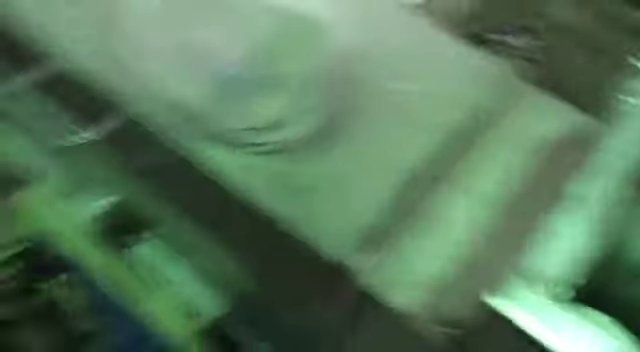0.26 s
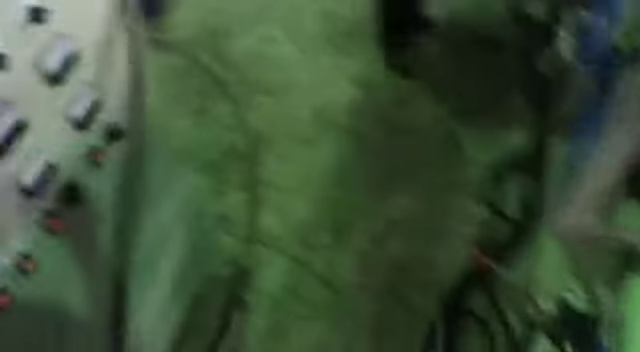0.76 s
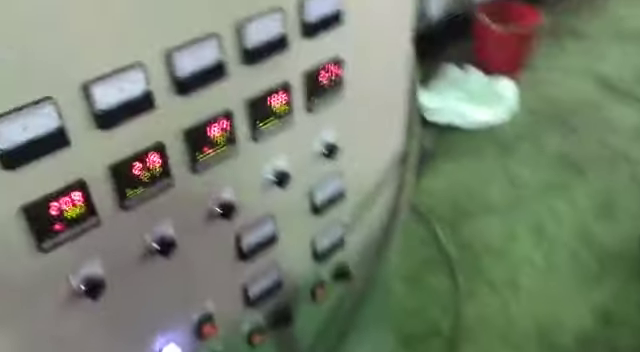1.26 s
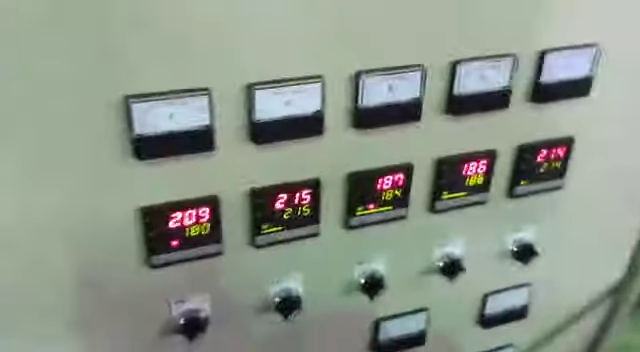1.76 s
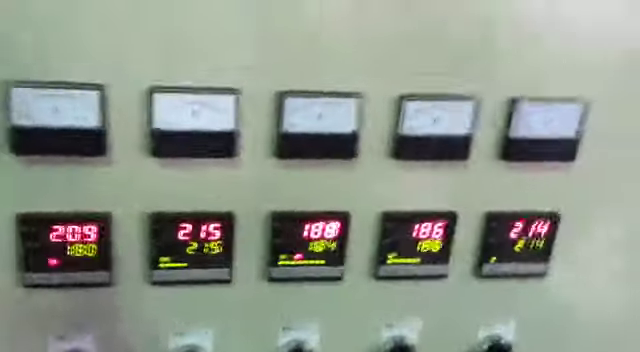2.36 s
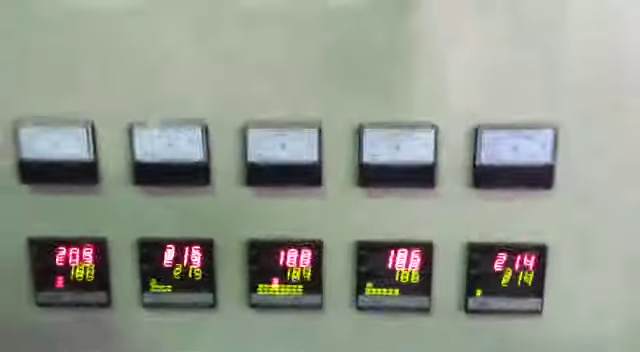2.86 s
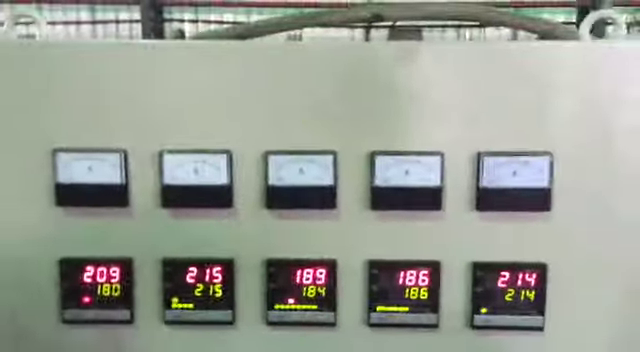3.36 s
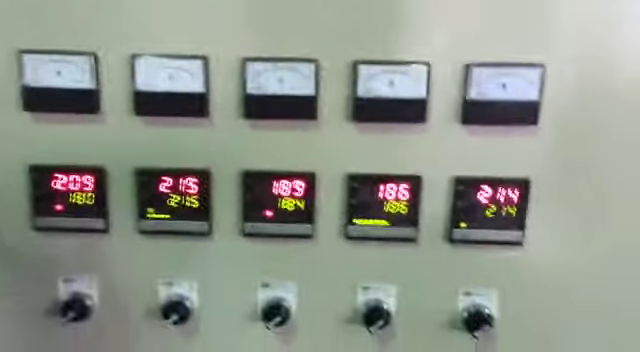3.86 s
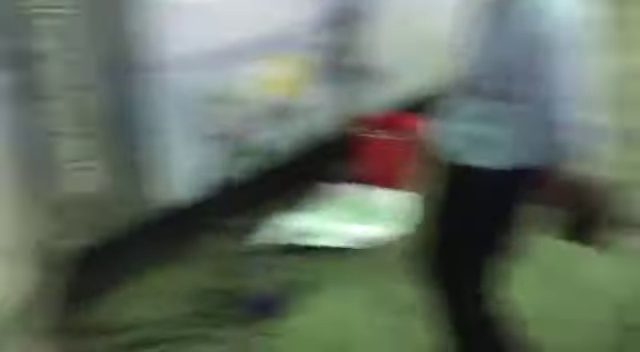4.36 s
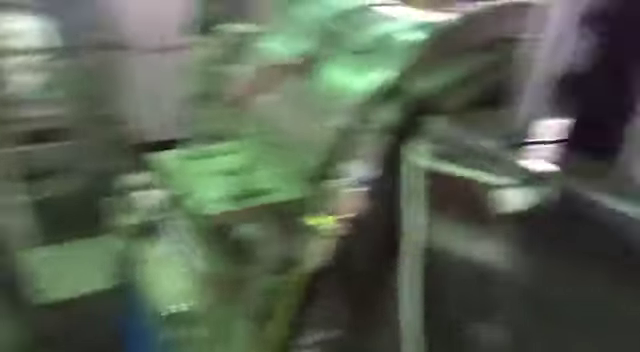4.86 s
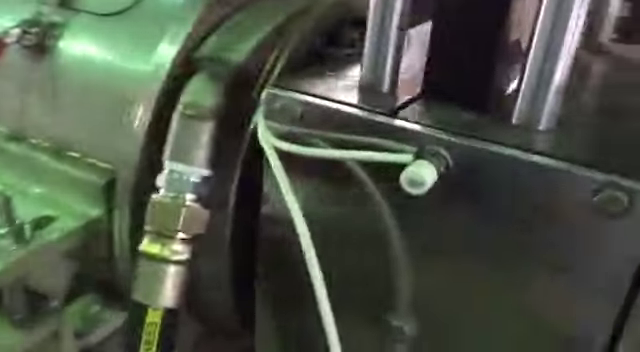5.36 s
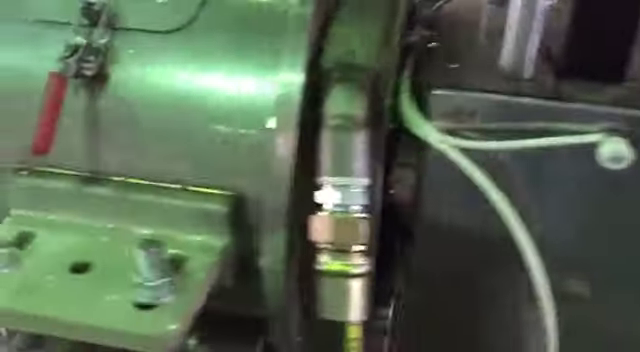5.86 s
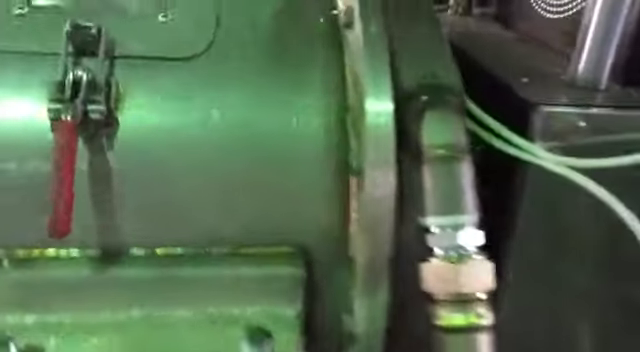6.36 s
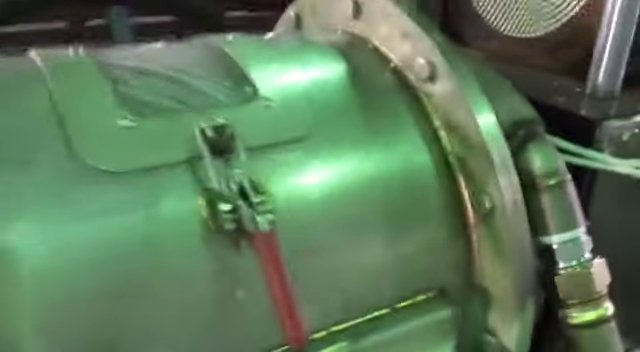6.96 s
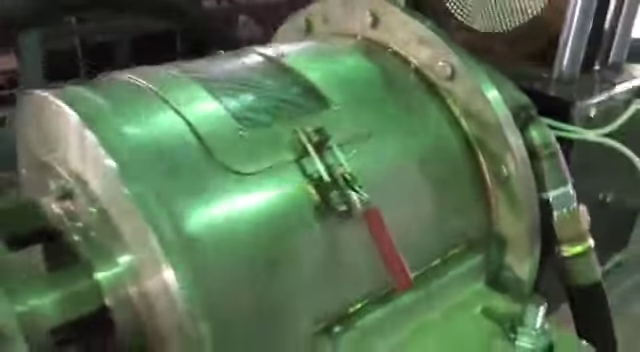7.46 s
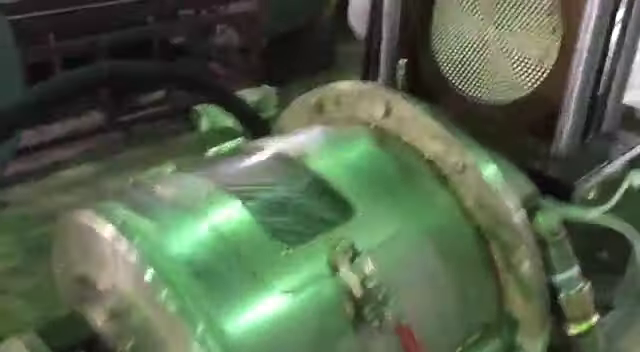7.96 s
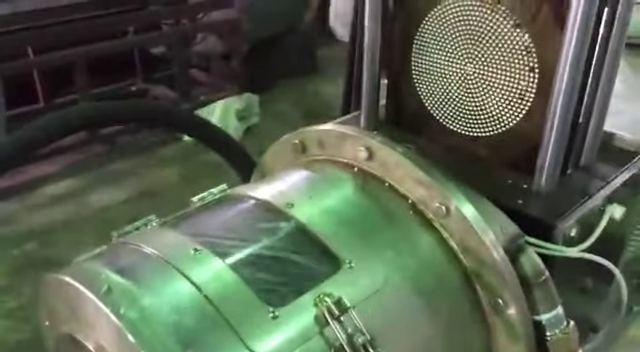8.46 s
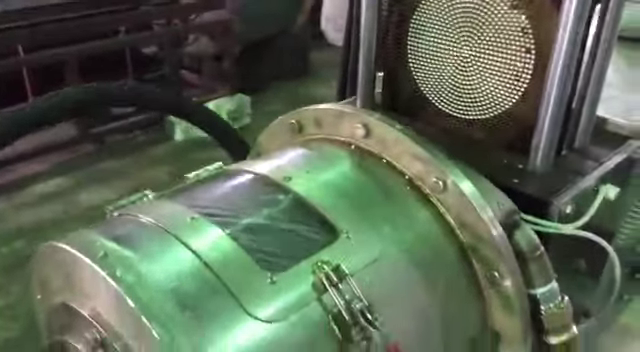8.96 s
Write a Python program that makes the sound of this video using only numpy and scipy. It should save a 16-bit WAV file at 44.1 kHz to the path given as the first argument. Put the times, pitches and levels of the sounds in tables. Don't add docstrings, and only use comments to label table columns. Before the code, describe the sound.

Continuous loud factory drone with a throbbing low hum, wandering gear and motor whines, a few early belt squeals and a rough airy roar.

```python
import sys
import numpy as np
from scipy import signal
from scipy.fft import rfft, irfft, next_fast_len
from scipy.io import wavfile
from scipy.ndimage import uniform_filter1d, map_coordinates

SR = 44100
rng = np.random.default_rng(int(sys.argv[2]) if len(sys.argv) > 2 else 0)


def invert_db(level):
    return 10 ** (np.asarray(level, dtype=float) / 20)


def materialize(psi):
    bounded = np.clip(np.atleast_2d(psi).T, -1, 1)
    quanta = np.round(bounded * 32767).astype(np.int16)
    wavfile.write(sys.argv[1], SR, quanta)


N = 406161
TIME_S = np.arange(N) / SR


def unit(x):
    return x / np.sqrt(np.mean(x ** 2) + 1e-20)


def curves(rows):
    s, *columns = np.transpose(rows)
    return [np.interp(TIME_S, s, column) for column in columns]


def wobble(rate):
    points = rng.standard_normal(int(N * rate / SR) + 4)
    return map_coordinates(points, [np.arange(N) * rate / SR])


def filtered(x, response):
    m = next_fast_len(N + SR // 4)
    return irfft(rfft(x, m) * response(np.fft.rfftfreq(m, 1 / SR)), m)[..., :N]


def gate(spans):
    t = np.arange(0, N + 64, 64) / SR
    total = 0
    for s, length in spans:
        opening = np.clip(np.minimum(t - s, s + length - t) / .018, 0, 1)
        total = total + np.sin(np.pi / 2 * opening) ** 2
    return np.interp(TIME_S, t, total)


def humps(rows, shape=1.054):
    t = np.arange(0, N + 128, 128) / SR
    tops = []
    for s, half, db, *_ in rows:
        tops.append(invert_db(db) * np.clip(1 - np.abs(t - s) / half, 0, 1) ** shape)
    return np.interp(TIME_S, t, np.max(tops, axis=0))


def rush(spectrum, patchy_db, ring_db=0):
    z = signal.stft(rng.standard_normal(N), nperseg=512)[2]
    patches = uniform_filter1d(rng.standard_normal(z.shape), size=9, axis=0)
    patches = uniform_filter1d(patches, size=12, axis=1)
    streaks = uniform_filter1d(rng.standard_normal(z.shape), size=5, axis=1)
    gain = invert_db(patchy_db * unit(patches) + ring_db * unit(streaks))
    noise = signal.istft(z * gain, nperseg=512)[1][:N]
    f, db = np.transpose(spectrum)
    return unit(filtered(noise, lambda hz: invert_db(np.interp(np.log(hz + 1), np.log(f), db, -120, -120))))


def tone(hz, blur, flutter_db):
    phase = 2 * np.pi * np.cumsum(hz) / SR + blur * wobble(9)
    level = np.sqrt(2) * invert_db(flutter_db * wobble(11))
    return level * np.sin(phase + rng.uniform(0, 2 * np.pi))


# (frequency [Hz], level per Hz [dB])
BARREL_SPECTRUM = [(20, -23), (40, -13.5), (62, -9), (80, -4), (140, -0.5), (260, -4), (420, -5),
                   (1000, -13.5)]
# (frequency [Hz], level per Hz [dB])
HALL_SPECTRUM = [(350, -19), (700, -5), (1000, 0), (1800, -1), (2400, -5), (3300, -14), (5000, -34)]
# (frequency [Hz], level per Hz [dB])
PELLETS_SPECTRUM = [(1800, -18), (2800, -1.5), (3900, -0.5), (4400, -3), (6500, -3), (7600, -4.5),
                    (9000, -30)]
# (frequency [Hz], level per Hz [dB])
AIR_SPECTRUM = [(6000, -20), (7400, -6.5), (8100, 0.5), (9300, 0), (10300, -2.5), (10550, -3.5),
                (10720, -23), (10900, -32)]
# (time [s], nearness to the barrel [dB], turn toward the cooling air [dB])
WALK = [(0, -2, 0), (.6, -3, -1.6), (1.2, 0, 0.5), (1.5, 0.5, 0.5), (1.8, 0, -1.5), (2.4, -0.8, -3),
        (3.2, 0.3, -0.5), (4.4, 1.5, 0.4), (4.55, 2, 4), (5.1, 0, 2.5), (5.7, 1.6, 2), (6.3, -1, 1),
        (6.6, 1.3, 0), (7.2, 0.7, 1), (7.5, .6, 2), (8.1, -0.5, 1.5), (8.7, -.3, 2), (9.21, -0.5, 1)]
# (level [dB], effect of nearness [dB per dB], effect of turning [dB per dB],
# growth as we walk into the hall [dB per s])
ROAR_LAYERS = [
    (-24, 0.92, -.05, 0.004),
    (-28, 0.12, 0.04, 0.31),
    (-32, 0.22, .45, 0.1966),
    (-31, .01, 1.02, 0.0129),
]
# (time [s], rise [dB])
FEED_SURGES = [(0.204, 1.5), (0.776, 2), (1.329, 2), (1.45, 0), (1.713, 1), (1.978, 1.5), (2.3, 0),
               (2.652, 1.5), (3.147, 0.7), (3.584, 0.5), (3.816, 0), (4.53, 0.2), (4.7, .6), (5.3, .6),
               (6.304, -0.5), (6.567, 1.5), (6.74, 0.5), (7.378, 2), (7.676, 0.5), (7.9, .7), (8.3, 0.5),
               (8.6, .7), (9.009, 1)]
# (time [s], length [s])
AIR_PUFFS = [(0.0, .022), (.075, .07), (.17, .083), (.339, .068), (1.073, .067), (1.422, .065),
             (1.538, .075), (1.886, .12), (2.173, .073), (2.266, .091), (2.588, .125), (3.094, .085),
             (3.721, .079), (4.046, .084), (4.138, .077), (4.511, .083), (4.951, .063), (5.299, .077),
             (6.121, .043), (6.275, .082), (6.677, .102), (7.346, .1), (7.531, .082), (7.63, .099),
             (7.765, .26), (8.038, .085), (8.459, .077), (8.836, .1), (8.978, .095), (9.177, .033)]


def roar():
    near_db, turn_db = curves(WALK)
    levels = [db + near * near_db + turn * turn_db + deeper * TIME_S
              for db, near, turn, deeper in ROAR_LAYERS]
    barrel_db, hall_db, pellets_db, air_db = levels
    load_db = 0.27 * wobble(14)
    for s, db in FEED_SURGES:
        load_db = load_db + db * np.exp(-((TIME_S - s) / 0.02) ** 2)
    puffs = gate(AIR_PUFFS)
    hall_db = hall_db + 1.17 * load_db
    pellets_db = pellets_db + 0.34 * puffs + 1.44 * load_db
    air_db = air_db - .5 + 1.1 * puffs + .8 * load_db + 0.7 * wobble(12)
    barrel = invert_db(barrel_db) * rush(BARREL_SPECTRUM, patchy_db=1.03, ring_db=1.43)
    hall = invert_db(hall_db) * rush(HALL_SPECTRUM, patchy_db=0.72, ring_db=2.5)
    pellets = invert_db(pellets_db) * rush(PELLETS_SPECTRUM, patchy_db=0.56, ring_db=3.0)
    air = invert_db(air_db) * rush(AIR_SPECTRUM, patchy_db=0.5, ring_db=3.0)
    return barrel + hall + pellets + air


# (multiple of its turning rate, level by the cabinet [dB], change at the barrel [dB])
SHAFT_ORDERS = [(5, -37, -3), (6.014, -44, 10), (7, -46.5, 3), (8.02, -43, 7), (9, -46, 0.5),
                (9.97, -41.5, 4), (11.01, -34.5, 3), (23.93, -45.5, 4.5)]


def shaft():
    leaves_cabinet_s, crossing_s = 4.35, 0.66
    arrived = np.clip((TIME_S - leaves_cabinet_s) / crossing_s + .5, 0, 1)
    turning_hz = 14.93 * (1 + .002 * wobble(0.696))
    total = 0
    for order, db, change_db in SHAFT_ORDERS:
        level = invert_db(db + change_db * arrived + 1.7 * wobble(1.33))
        total = total + level * tone(order * turning_hz, blur=0.09, flutter_db=1.5)
    return total


# (time [s], half length [s], peak level [dB])
PUMP_SPOTS = [(.1, 0.38, -36), (.85, 0.65, -33), (2.4, .5, -33.5), (3.5, .45, -32), (4.0, .15, -30),
              (5.55, 0.42, -33), (6.4, .4, -42), (7.299, .6, -39), (8.7, 0.69, -36)]
# (time [s], half length [s], peak level [dB])
PUMP_OCTAVE_SPOTS = [(3.4, 0.71, -41), (5.6, .7, -41)]
# (time [s], half length [s], peak level [dB])
GEAR_SPOTS = [(0, .15, -35.5), (0.948, .24, -29.5), (1.369, .24, -29), (1.9, 0.29, -36), (2.5, 0.23, -35.5),
              (3.15, .3, -33), (3.8, 0.44, -39), (4.7, .3, -34), (6.1, .2, -29), (6.6, 0.26, -31),
              (7.5, 0.18, -36), (8.198, .3, -29.5), (8.75, 0.24, -35), (9.21, 0.22, -34)]
# (time [s], half length [s], peak level [dB])
GEAR_OCTAVE_SPOTS = [(1.2, 0.1, -42), (1.75, 0.22, -37)]
# (time [s], half length [s], peak level [dB])
CUTTER_SPOTS = [(1.545, .3, -35), (2.6, .3, -41), (3.1, .4, -36.5), (3.5, 0.17, -31.5), (4.28, .3, -34),
                (5.2, .4, -43), (5.8, 0.15, -27.5), (6.1, .36, -29), (6.75, .3, -36.5), (7.15, .3, -37),
                (7.8, .25, -35.5), (8.199, 0.29, -42), (9.1, 0.53, -38.5)]
# (time [s], half length [s], peak level [dB])
FEEDER_SPOTS = [(.7, 0.26, -33.5), (1.5, .3, -46), (2.3, 0.59, -48), (3.0, .4, -37), (3.6, 0.27, -42),
                (4.199, 0.34, -35), (4.78, 0.25, -36.5), (7.5, .45, -40), (8.1, 0.28, -47), (9.0, .25, -47)]
# (time [s], half length [s], peak level [dB], #
# pitch [Hz])
SHORT_SQUEALS = [
    (.44, 0.064, -34.5, 625),
    (1.102, .06, -31, 695),
    (1.32, .09, -32, 952),
    (1.552, 0.097, -38, 990),
    (1.673, .06, -32.5, 1020),
]


def drives():
    pump_hz, gear_hz, feeder_hz = 241.5, 328.5, 704
    cutter_hz = 690.5 - 6.5 * (TIME_S < 2.1)
    lines = [(pump_hz, PUMP_SPOTS), (2 * pump_hz, PUMP_OCTAVE_SPOTS),
             (gear_hz, GEAR_SPOTS), (2 * gear_hz, GEAR_OCTAVE_SPOTS),
             (cutter_hz, CUTTER_SPOTS), (feeder_hz, FEEDER_SPOTS)]
    whines = 0
    for hz, spots in lines:
        level = invert_db(-58.5) + humps(spots, shape=.4)
        whines = whines + level * tone(hz + 1.3 * wobble(3), blur=0.33, flutter_db=1.4)
    pitches = [(s + side * half / 2, hz) for s, half, _, hz in SHORT_SQUEALS for side in (-1, 1)]
    squeal_hz, = curves(pitches)
    return whines + humps(SHORT_SQUEALS, shape=.8) * tone(squeal_hz, blur=0.5, flutter_db=1.5)


# (time [s], half length [s], peak level [dB], pitch [Hz])
BLADE_SWELLS = [(0.0, .05, -12.5, 182.3), (.174, 0.13, -15, 180.3), (.35, 0.158, -10.5, 180.3),
                (.63, .13, -16.5, 183.5), (.755, 0.049, -14.5, 185.5), (1.0, 0.145, -14.5, 180.6),
                (1.19, 0.088, -16, 182.6), (1.381, 0.083, -16.5, 179.3), (1.58, .22, -17, 181),
                (1.89, 0.14, -15, 180), (2.085, .12, -12, 181.9), (2.26, 0.089, -11.5, 180.9),
                (2.39, .11, -16, 182.8), (2.72, 0.2003, -15, 181.7), (3.145, 0.079, -14, 178.7),
                (3.224, 0.06, -14, 182), (3.584, 0.042, -14.5, 178.1), (3.665, 0.055, -15.5, 187),
                (4.19, 0.2214, -18, 184.3), (4.53, .12, -19.5, 185.8), (3.42, .13, -19.5, 182.5),
                (6.158, 0.141, -14, 177.8), (6.33, 0.12, -16.5, 177.5), (6.45, 0.15, -18, 179),
                (7.42, 0.14, -19.5, 181.4), (7.648, 0.073, -15.5, 187.6), (8.007, .15, -17, 184),
                (8.254, .1, -17, 181.2), (8.787, .12, -18.5, 191.8), (9.04, 0.069, -13.5, 186)]
# (time [s], half length [s], peak level [dB], pitch [Hz])
LAST_SWELL = (8.5, 0.14, -12.5, 180.5)
# (frequency [Hz], width [Hz], level [dB])
DUCT_RINGS = [
    (169, 40, -8),
    (196, 20, -3),
    (364, 22, -11.5),
    (594, 43, -18),
]


def duct_ring(f):
    return sum(invert_db(db) * 1j * f * w / (c * c - f * f + 1j * f * w) for c, w, db in DUCT_RINGS)


def duct_turbulence():
    blade_hz, blade_width_hz = 182, 16

    def response(f):
        beside = 1 - np.exp(-((f - blade_hz) / blade_width_hz) ** 2)
        return beside * np.abs(duct_ring(f)) ** 1.63
    return unit(filtered(rng.standard_normal(N), response))


def blower():
    beats = BLADE_SWELLS + [LAST_SWELL]
    hz, = curves([(s, hz) for s, _, _, hz in beats])
    reach = humps([(s, 1.51 * half, 0) for s, half, *_ in beats])
    chance = np.hypot(wobble(17), .6 * wobble(17))
    beads = invert_db(-26.5) * 1.9 * np.tanh(chance / 1.7) * np.clip(1 - 2.19 * reach, 0, 1)
    deepest_dip = invert_db(-29.5)
    swell = deepest_dip + np.maximum(humps(beats, shape=1.14), beads)
    slip_hz = 3.5 * wobble(24) * swell.mean() / swell
    flicker = invert_db(-1.78 + 1.3 * wobble(30))
    drone = flicker * swell * tone(hz + slip_hz, blur=0.29, flutter_db=0.64)
    return drone + invert_db(-27.5) * duct_turbulence()


def scene():
    mono = roar() + shaft() + drives() + blower()
    return np.array([mono, mono])


def roll_off(x):
    return signal.sosfilt(signal.butter(12, 11430, fs=SR, output="sos"), x)


# (frequency [Hz], level per Hz [dB])
TOP_SPECTRUM = [(10780, 5), (10950, 0), (11170, -8), (11230, -34)]
# (time [s], low edge [Hz])
SIDE_BANDS = [(.743, 4260), (.768, 8960), (3.066, 6310), (5.249, 4640), (5.249, 5590), (7.293, 5230),
              (7.71, 5170), (7.896, 8960), (8.616, 6900), (8.732, 6260), (8.732, 7060), (8.964, 6840),
              (8.964, 8960)]


def record(dry):
    hiss = rng.standard_normal(N)
    side = 0
    for s, low in SIDE_BANDS:
        high = min(1.18 * low, 10300)
        band = unit(filtered(hiss, lambda hz: (hz > low) & (hz < high)))
        level = invert_db(-41) * (low / 5000) ** (5 / 6)
        side = side + level * gate([(s - .022, .045)]) * band
    both = dry + side * [[1], [-1]]

    top_open = invert_db(-58) * gate(AIR_PUFFS)
    narrow_hz, wide_hz = 10600, 10750
    is_wide = (wobble(14) > -.5) | (top_open > 0)
    wide = uniform_filter1d(1. * is_wide, size=SR // 50)
    edge = wide * filtered(both, lambda hz: (hz >= narrow_hz) & (hz < wide_hz))
    kept = filtered(both, lambda hz: hz < narrow_hz) + edge
    mix = kept + top_open * rush(TOP_SPECTRUM, patchy_db=1.5)
    return roll_off(mix)


dry = scene()
out = record(dry)
materialize(out)
```